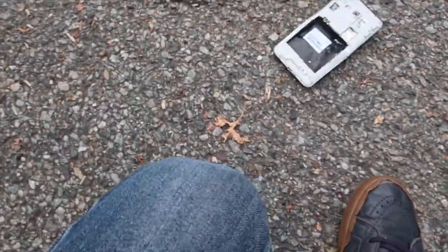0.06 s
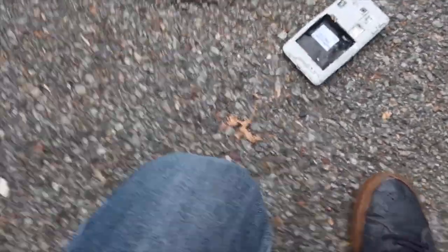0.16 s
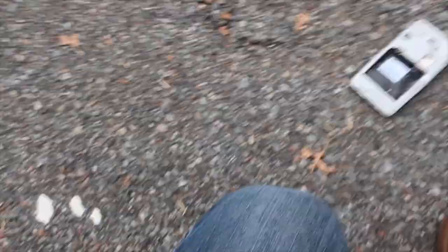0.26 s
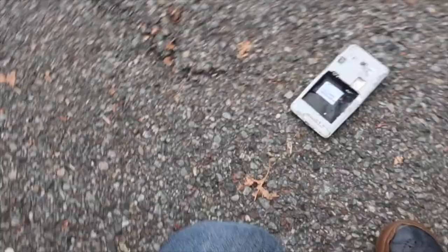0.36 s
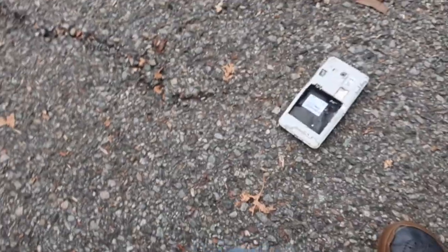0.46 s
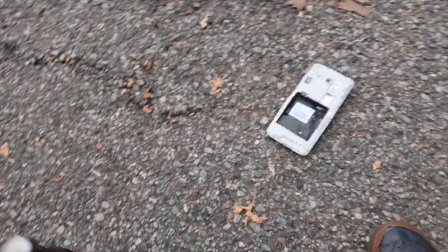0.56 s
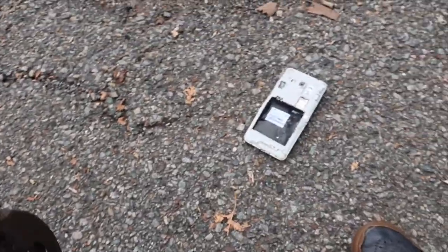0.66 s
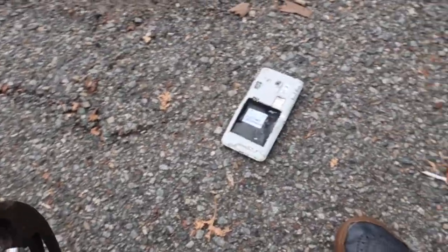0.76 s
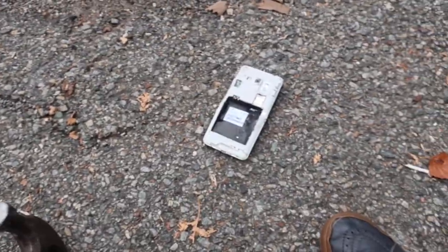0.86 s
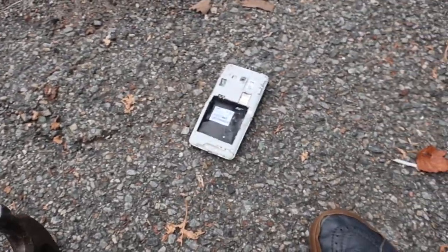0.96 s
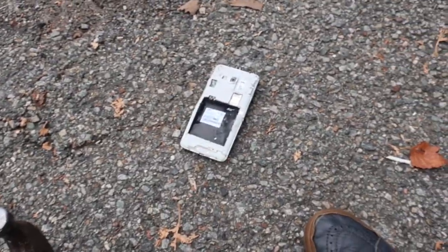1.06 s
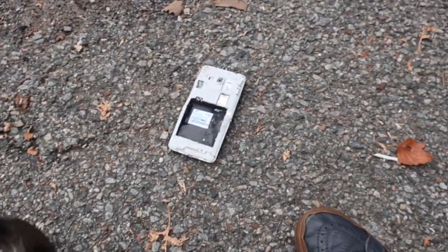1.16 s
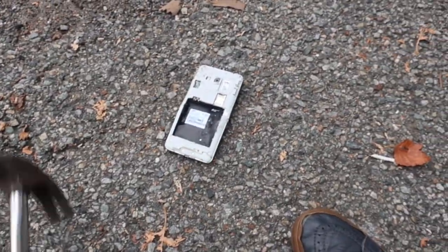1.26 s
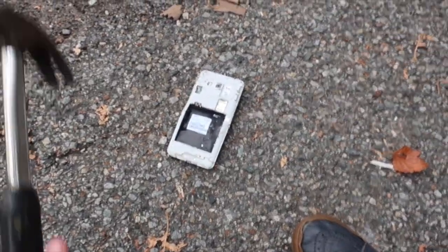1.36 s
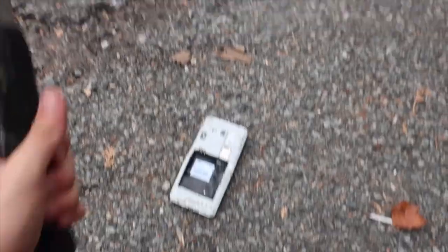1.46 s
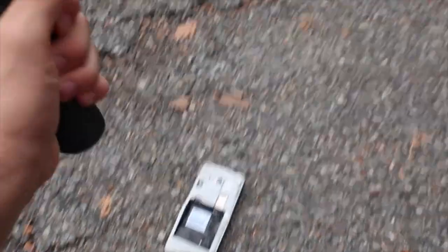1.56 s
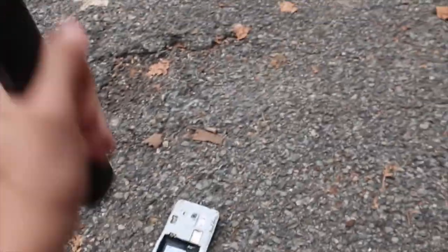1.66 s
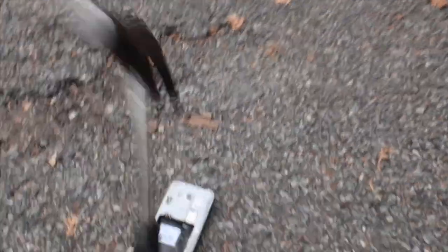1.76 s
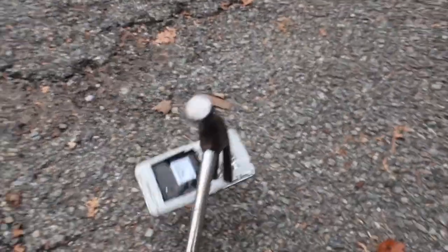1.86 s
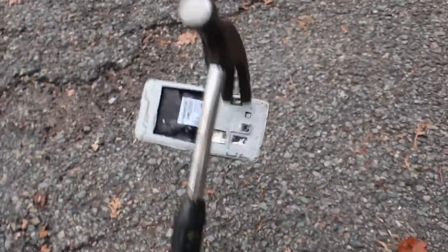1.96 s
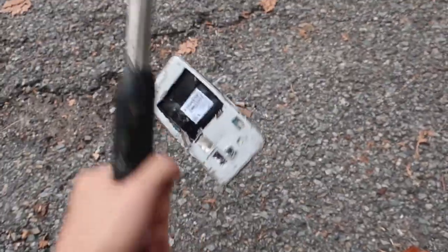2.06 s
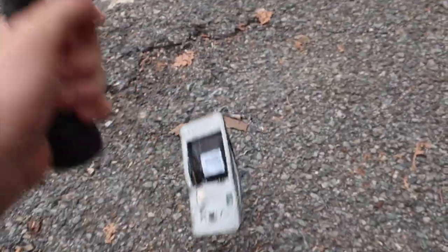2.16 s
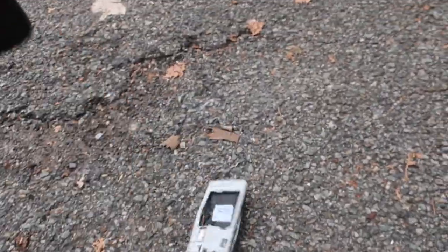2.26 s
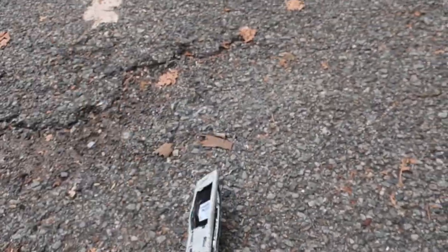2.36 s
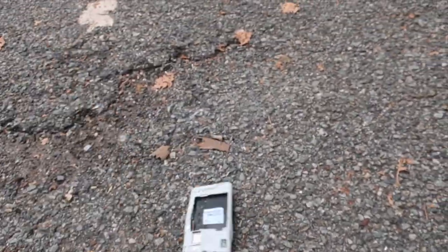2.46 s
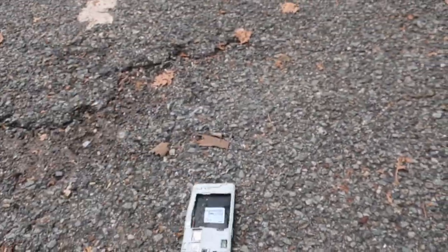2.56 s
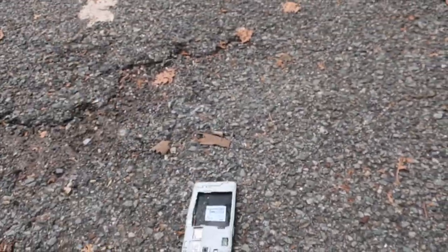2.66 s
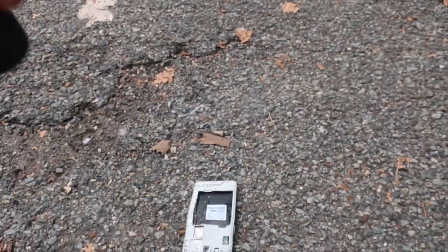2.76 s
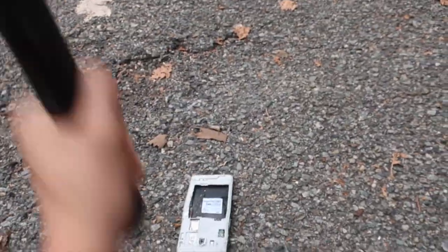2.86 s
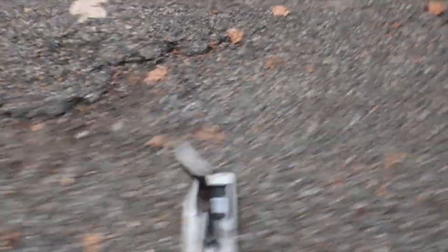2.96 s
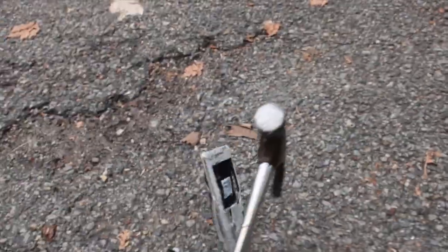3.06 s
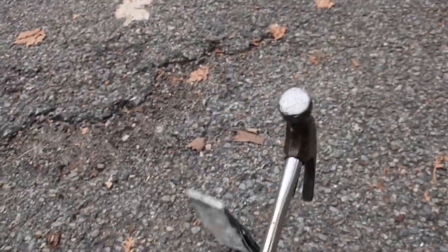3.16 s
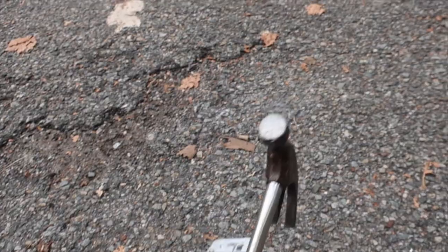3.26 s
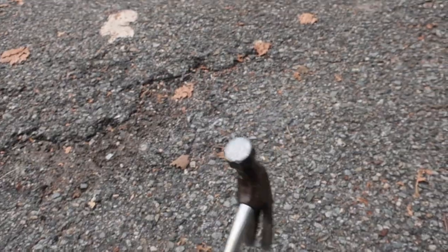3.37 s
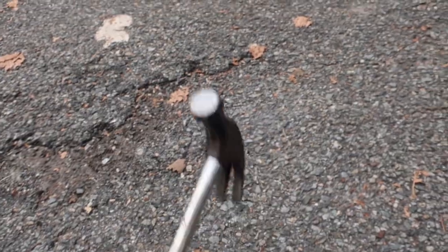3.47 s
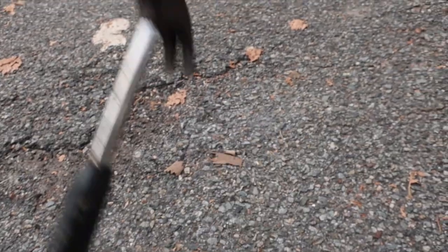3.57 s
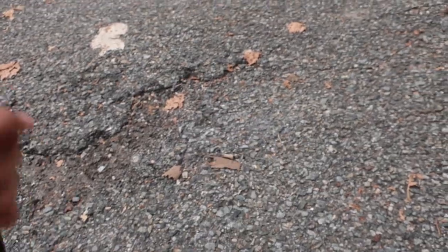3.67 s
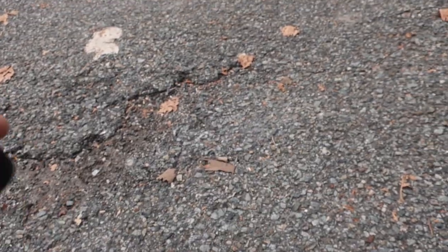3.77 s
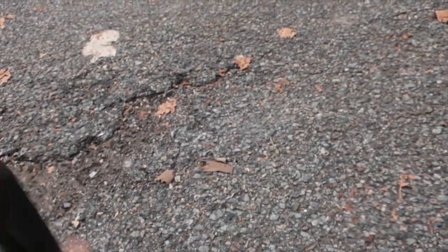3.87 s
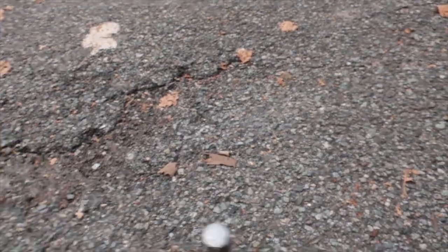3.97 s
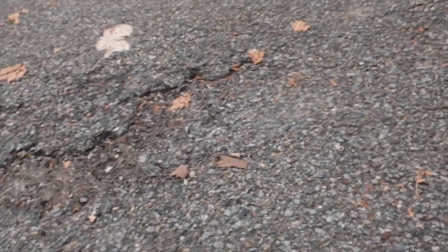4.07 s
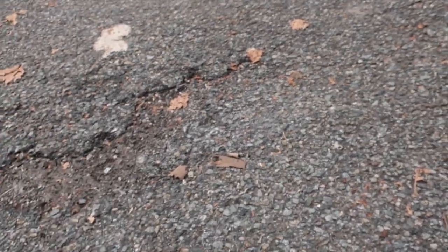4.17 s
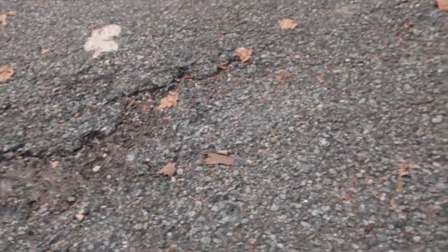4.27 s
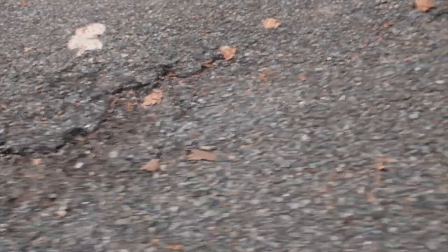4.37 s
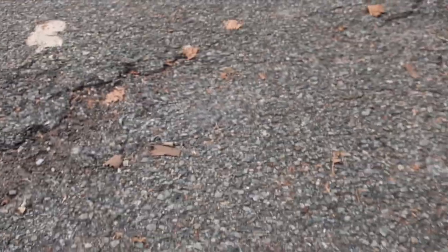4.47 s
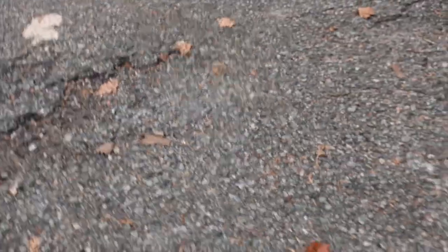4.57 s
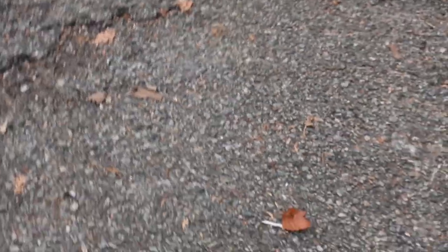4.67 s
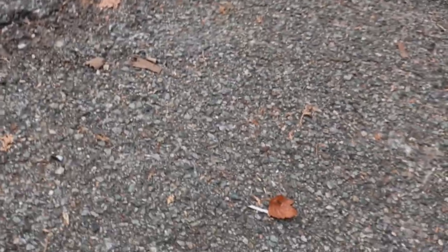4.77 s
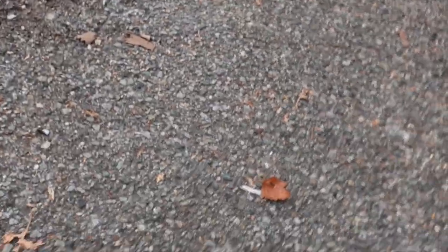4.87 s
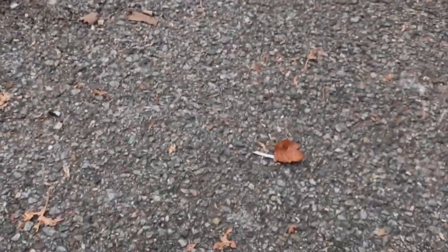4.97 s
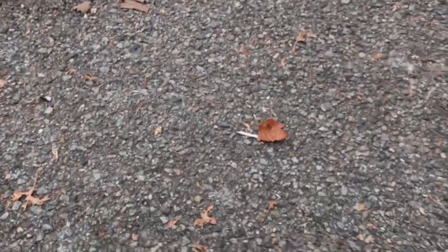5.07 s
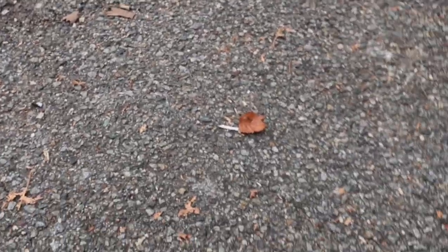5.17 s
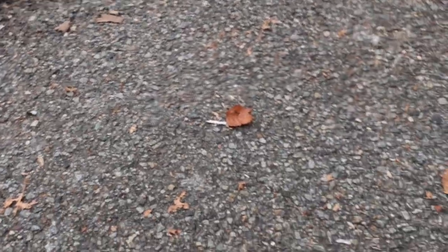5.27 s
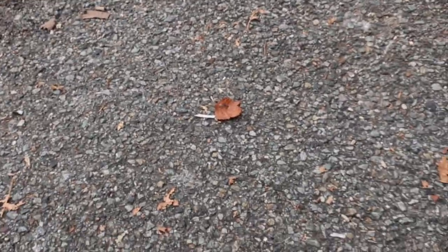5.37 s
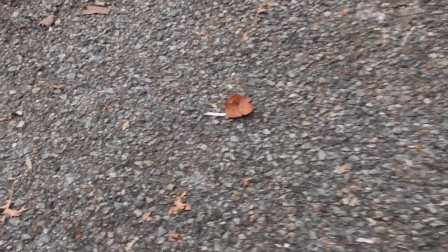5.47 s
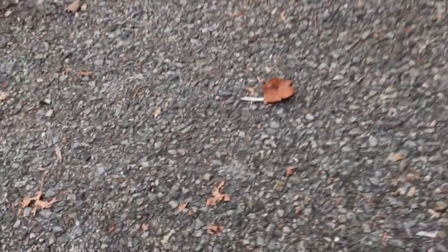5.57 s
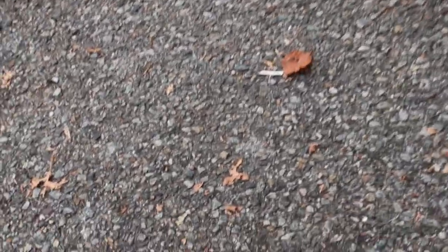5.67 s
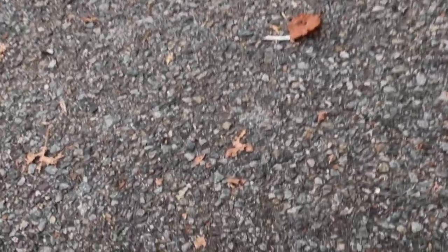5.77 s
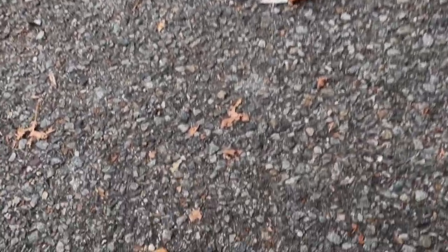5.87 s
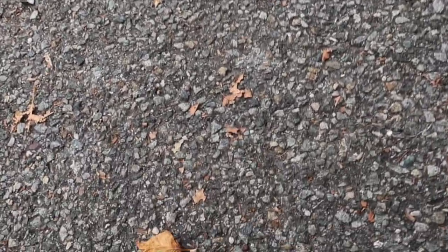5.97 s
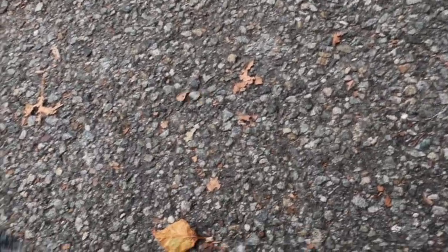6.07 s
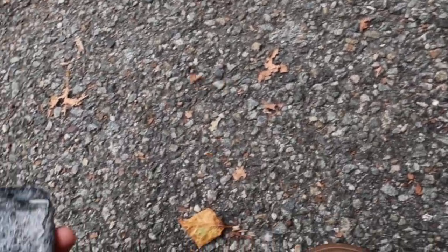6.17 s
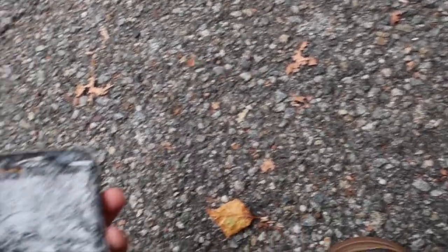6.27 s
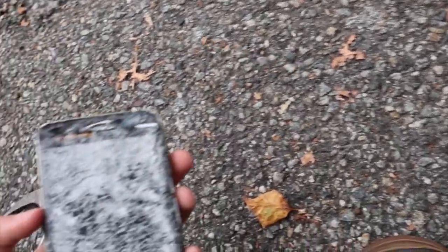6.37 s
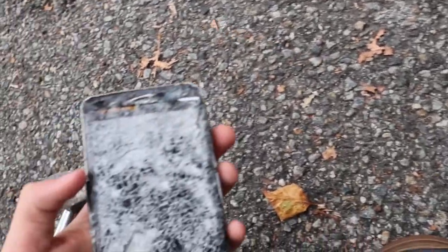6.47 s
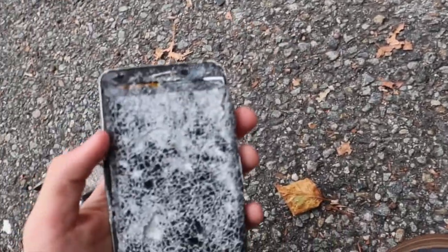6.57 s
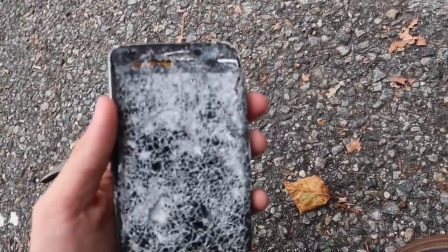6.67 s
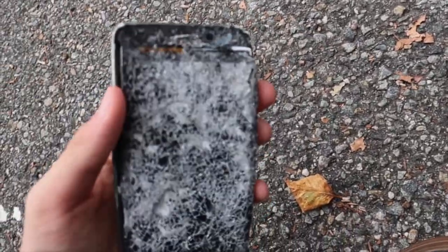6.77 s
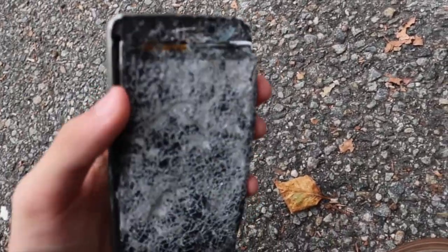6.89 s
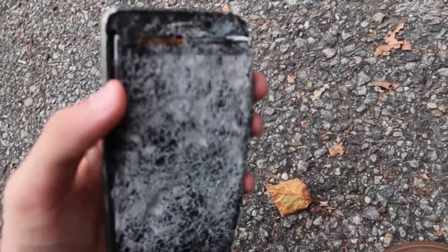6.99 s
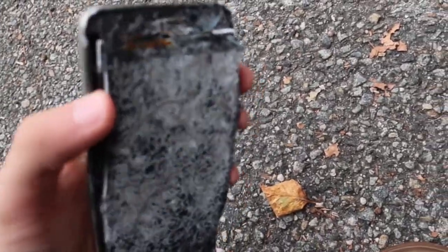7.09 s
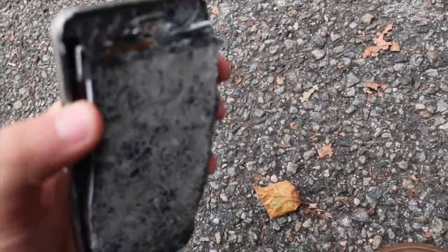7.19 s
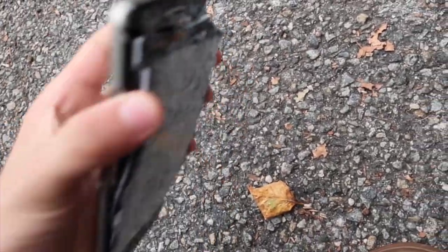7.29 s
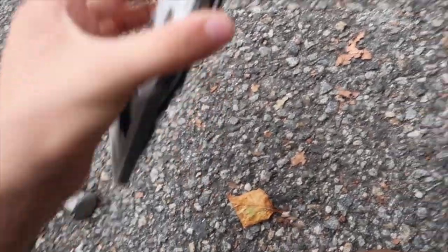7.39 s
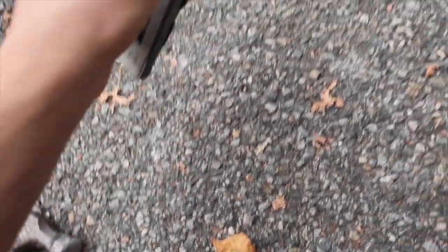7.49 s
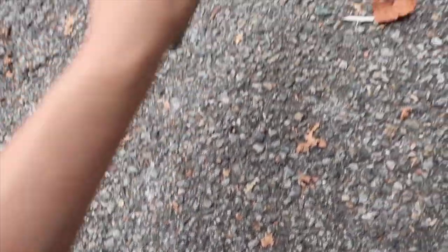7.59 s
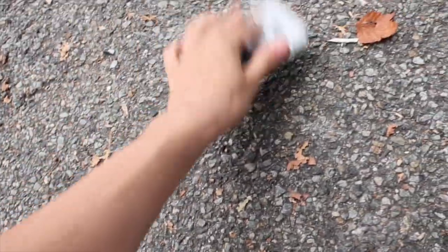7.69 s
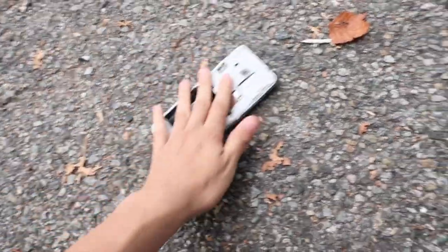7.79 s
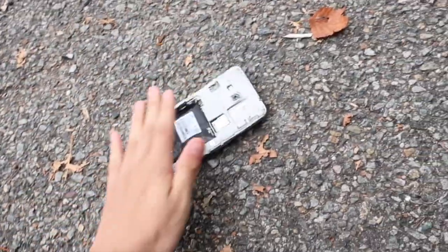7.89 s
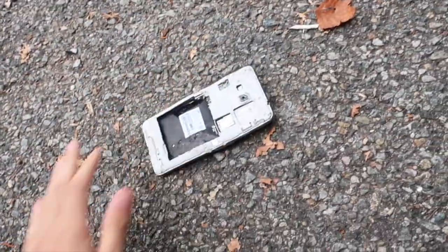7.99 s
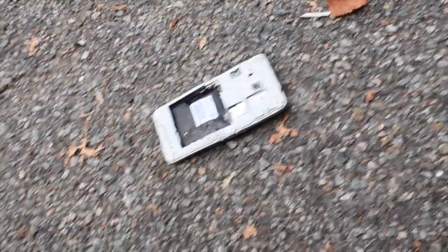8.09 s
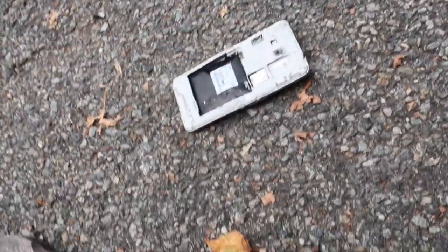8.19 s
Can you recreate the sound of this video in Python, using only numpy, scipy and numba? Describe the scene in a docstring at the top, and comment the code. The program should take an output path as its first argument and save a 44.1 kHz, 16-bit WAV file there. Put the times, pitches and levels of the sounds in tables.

```python
"""A hammer comes down three times on a broken phone lying on asphalt; later the phone is dropped flat.
Each blow is a gliding, noisy crack with a ringing case, a sinking thud and a spray of shards.
Around the blows, steel and plastic tap, click and ping, and pieces slide and scrape as grainy noise.
Distant traffic is shaped noise with a low hum. A gain control pulls loud peaks down, then creeps back;
what still exceeds its ceiling is clipped."""
import sys
import numpy as np
from scipy import signal
from scipy.fft import rfft, irfft
from scipy.io import wavfile
from scipy.ndimage import uniform_filter1d
from numba import njit

SR = 44100
rng = np.random.default_rng(int(sys.argv[2]) if len(sys.argv) > 2 else 0)


def store_pcm(level_fs):
    """Save levels as 16-bit WAV."""
    pcm = np.round(np.clip(level_fs, -1, 1) * 32767).astype(np.int16)
    wavfile.write(sys.argv[1], SR, np.atleast_2d(pcm).T)


N = 363384

# Modes of the broken case: (frequency [Hz], relative level [dB], t60 [s])
CASE_MODES = [(667, -2, 0.013), (907, -1.5, 0.024), (1830, -2.5, 0.027), (3030, -9, 0.027),
              (3830, -2, 0.016), (5200, -7, 0.016)]
# Hammer blows and the flat drop; every level after the first is relative to the blow:
# (time [s], level [dB], first crack pitch [Hz], last crack pitch [Hz], ground thud [dB], treble [dB],
#  case ring trim [dB], shards [dB], lean to the right [ratio], contact [s])
BLOWS = [(1.9102, 14.5, 2493, 4117, 2.5, -14, -4.5, -18, 0.18, 0.0047),
         (3.0761, 13, 2760, 4214, 4.5, -12.5, -13, -24, 0.22, 0.0055),
         (4.0733, 15.5, 4473, 965, 6, -28, -7, -17.5, 0.29, 0.0044),
         (7.813, 14.5, 3890, 3760, -15.5, -16, -13, -22, 0.18, 0.00353),
         (7.8282, 10.5, 2800, 1520, -11, -17, -5.5, -16, 0.24, 0.0029)]


def blows():
    """The case cracks while in contact and rings on; the asphalt answers with a low thud as contact ends."""
    let_go_s, thud_hz, thud_t60_s = .0004, 350, .015
    thud_sag_s = .0066  # the thud's pitch sinks as the ground gives
    crack_wobble, crack_noise_db = .5, -7
    out, t = np.zeros((2, N)), np.arange(4000) / SR
    for s, db, first_hz, last_hz, thud_db, treble_db, ring_db, shards_db, lean, touch in BLOWS:
        noise = rng.standard_normal((5, len(t)))
        late = np.maximum(t - touch, 0)  # time since contact ended
        contact = np.clip(t / .0017, 0, 1) * np.exp(-late / let_go_s)

        hz = first_hz * (last_hz / first_hz) ** np.minimum(t / (.65 * touch), 1)
        hz = hz * (1 + crack_wobble * band(noise[0], 110, 2800))
        crack = np.sin(2 * np.pi * np.cumsum(hz) / SR)
        crack = crack + level(band(noise[1], 1100, 5900), crack_noise_db)
        crack = contact * (crack + level(band(noise[2], 5100, 21000), treble_db))

        thud_phase = 2 * np.pi * thud_hz * thud_sag_s * (1 - np.exp(-late / thud_sag_s))
        thud = -undb(thud_db) * np.sin(thud_phase) * decay(late, thud_t60_s)

        case = np.zeros(len(t))
        for mode_hz, mode_db, t60 in CASE_MODES:
            rattle = band(rng.standard_normal(len(t)), mode_hz / 1.117, mode_hz * 1.1)
            case += undb(mode_db + ring_db) * level(rattle, -3.8) * decay(late, t60)

        settle = grit(len(t), 1.8) * decay(t, .07)
        shards = level(band(noise[3], 910, 11000), shards_db) * settle
        spray = level(band(noise[4], 1500, 21000), -20.5) * (contact + undb(shards_db + 19) * settle)
        side = spray - lean * band(crack + case + thud, 300, 1700)
        add(out, s, undb(db) * np.array([crack + case + thud + shards, side]))
    return out


# Small knocks, each starting half a millisecond early; levels are rms over its first 340 samples:
# (time [s], nominal t60 [s], thump [dB], knock [dB], knock pitch [Hz], treble [dB], treble pitch [Hz])
TAPS = [(0.2753, 0.0049, -24.5, -43, 1860, -62, 11700), (0.305, 0.0093, -23, -28, 950, -52, 10000),
        (0.3147, 0.012, -20, -43, 950, -52, 8000), (0.521, 0.021, -30, -36.5, 1930, -61, 7900),
        (0.9567, 0.011, -9.5, -29.5, 3700, -20.5, 8750), (1.038, 0.018, -23, -43, 6900, -49, 9350),
        (1.069, 0.028, -33, -39, 5000, -52, 5600), (1.073, 0.009, -30, -49, 1000, -45, 6800),
        (1.089, 0.0099, -33, -48, 990, -46, 6460), (1.109, 0.011, -33, -51, 1200, -62, 13000),
        (1.242, 0.022, -50, -56, 933, -50, 5960), (1.903, 0.053, -23, -24.5, 2890, -34, 6330),
        (1.9062, 0.012, -19.5, -25.5, 2840, -31, 6050), (1.925, 0.012, -23, -17, 4060, -34, 10900),
        (1.928, 0.012, -34, -24, 4070, -38, 10500), (1.935, 0.04, -35.5, -21, 3290, -41, 5400),
        (2.333, 0.038, -41, -17, 3220, -50, 6300), (2.337, .029, -40.5, -22, 3300, -33.5, 12200),
        (2.351, 0.04, -34, -20.5, 4450, -35, 8300), (2.358, 0.014, -35, -14.5, 3530, -48, 7300),
        (2.364, 0.02, -40, -13.5, 2070, -42, 5900), (2.512, 0.031, -54, -36, 4360, -47, 11700),
        (2.517, 0.034, -42, -35, 1190, -63, 5180), (2.585, 0.031, -40, -26.5, 1885, -53, 9100),
        (2.593, 0.02, -43.5, -26, 3980, -44.5, 12600), (2.671, 0.0093, -41, -38, 3090, -69, 6600),
        (3.245, .015, -51.5, -36, 2800, -56.5, 11100), (3.275, 0.028, -36, -30.5, 3000, -43.5, 7570),
        (3.427, 0.022, -47.5, -19, 1780, -48, 5330), (3.4311, 0.023, -37, -15.5, 4260, -46, 7300),
        (3.445, 0.027, -54, -29, 1900, -42, 11900), (3.542, 0.025, -30, -23.5, 2100, -35, 5440),
        (3.86, 0.022, -49, -35, 990, -57.5, 12500), (4.18, 0.03, -59, -28.5, 1700, -46.5, 5200),
        (4.223, .021, -45, -42, 4280, -55, 6500), (4.232, 0.033, -54, -24, 4700, -49, 5900),
        (4.268, 0.01, -36, -23.5, 1880, -50, 5650), (4.299, 0.023, -47, -29.5, 1900, -53, 6400),
        (4.34, 0.02, -43, -32, 2030, -54, 5100), (4.4, 0.015, -36, -33, 1690, -48.5, 5200),
        (4.955, 0.024, -17, -60.5, 1000, -54, 13100), (4.974, 0.038, -28, -30.5, 1860, -55, 12760),
        (4.983, 0.02, -27, -30, 1930, -52, 7950), (5.062, 0.0081, -15, -22.5, 3020, -26, 5770),
        (5.067, 0.022, -24, -24.5, 5140, -37, 8900), (5.116, 0.045, -28.5, -56, 1710, -57, 8000),
        (5.123, 0.005, -27.5, -44.5, 1230, -49, 7950), (5.212, 0.033, -63, -48, 960, -52, 11100),
        (5.2535, 0.0073, -24.5, -32, 2130, -57, 5200), (5.2673, 0.0043, -15, -10.5, 1310, -43, 5530),
        (5.333, 0.012, -48, -25, 1390, -47.5, 5560), (5.356, 0.0052, -19.5, -23, 1400, -34.5, 5470),
        (5.497, 0.006, -26, -31, 940, -57, 12700), (5.5478, 0.021, -16, -40, 1040, -62, 5150),
        (5.558, 0.029, -19, -44.5, 1020, -56, 5950), (5.564, 0.02, -28, -22, 1040, -60, 3570),
        (5.581, 0.023, -25.5, -28, 1000, -58, 11700), (5.959, 0.025, -31, -40, 1020, -58, 5450),
        (6.39, 0.02, -36, -41, 1036, -57.5, 7500), (6.749, 0.027, -45, -39.5, 2600, -60.5, 7270),
        (7.249, 0.026, -46, -46.5, 1000, -61.5, 12300), (7.521, 0.015, -31, -49, 1000, -63, 12550),
        (7.8253, 0.023, -23, -10.5, 3900, -30, 5950)]


def taps():
    """Small knocks and scrapes: a thump, a ragged knock and a treble ring or spit."""
    octaves_per_s, treble_side_db, thump_side = 34, 19, .06
    out, t = np.zeros((2, N)), np.arange(3500) / SR
    for s, t60, thump_db, knock_db, hz, treble_db, treble_hz in TAPS:
        t60 = max(t60, .004)
        half = 2 ** (np.clip(octaves_per_s * t60, .2, 2) / 2)  # short taps ring in a narrower treble band
        push = (1 - np.exp(-t / (.14 * t60))) ** 2 * decay(t, t60)  # slower contact for longer sounds
        noise = rng.standard_normal((6, len(t))) * push * grit(len(t), 1.6)

        push_low = noise[0] * 1000. ** (.35 * t / t60)  # the bass dies away more slowly
        thump = band(push_low, 110, 460) + min(.0044 / t60, .6) * band(push_low, 380, 1100)
        thump = level(thump, thump_db, span=340)

        tick = band(noise[2] * decay(1.5 * t, t60), hz / 3, hz * 1.56)  # first contact: broad and short
        knock = band(noise[1], hz / 1.15, hz * 1.118) + 1.6 * tick
        knock = level(knock, knock_db, span=340)

        treble, across = band(band(noise[3:5], treble_hz / half, treble_hz * half), 3400, 14500)
        treble = level(treble, treble_db, span=340)
        across = level(across, treble_db + treble_side_db, span=340)
        across = across + level(band(noise[5], 2000, 6000), knock_db - 17.5, span=340)
        add(out, s - .0005, np.array([thump + knock + treble, across - thump_side * thump]))
    return out


# Modes of the hammer head: (frequency [Hz], relative level [dB], t60 [s])
STEEL_MODES = [(4450, 5, 0.012), (5650, 11.5, 0.015), (8940, -5, 0.045)]
# Hammer head touches: (time [s], level [dB], lift of the top mode [dB])
STEEL_TAPS = [(5.066, -28, 12), (5.2688, -30, 1), (5.333, -36.5, -24), (5.357, -22, -7)]


def steel():
    """The hammer head touches the ground and its modes ring briefly as decaying sines."""
    out, t = np.zeros((2, N)), np.arange(3000) / SR
    for s, db, top_db in STEEL_TAPS:
        ring = np.zeros(len(t))
        for (hz, mode_db, t60), lift_db in zip(STEEL_MODES, [0, 0, top_db]):
            ring += undb(mode_db + lift_db) * np.sin(2 * np.pi * hz * t) * decay(t, t60)
        onset = np.clip(t / .00046, 0, 1)
        add(out, s, undb(db) * ring * onset * grit(len(t), 2.0) * [[1], [1.1]])
    return out


# Hard point contacts, one broad snap each: (time [s], peak level [dB], lowest [Hz], highest [Hz])
CLICKS = [(.2742, -11, 600, 3600), (.306, -24, 2500, 4000), (.3142, -10, 500, 1600), (.9568, -6, 400, 4500),
          (1.0392, -14, 500, 5000), (1.0688, -24, 4000, 10000), (1.0755, -17, 500, 3500),
          (2.335, -9, 1800, 12000), (2.3395, -14, 2000, 12000), (2.3517, -9, 800, 14000),
          (2.3562, -9, 3000, 12000), (2.359, -4, 400, 4500), (2.3617, -2, 450, 5000),
          (2.3645, -8, 350, 3000), (2.3675, -7, 400, 2800), (2.3705, -14, 3000, 7000),
          (2.513, -33, 4000, 14000), (2.518, -32, 3500, 14000), (2.587, -30, 3000, 14000),
          (2.594, -20, 900, 7000), (3.4272, -13, 1100, 4500), (3.4322, -5, 500, 6500),
          (3.4345, -10, 450, 4000), (3.444, -20, 2500, 7000), (3.438, -24, 700, 3000),
          (3.544, -26, 800, 4000), (4.2695, -18, 900, 3000), (4.2335, -19, 2500, 7000),
          (4.2375, -18, 2500, 7000), (4.241, -19, 1800, 4000), (4.246, -20, 1500, 4000),
          (4.2735, -19, 3300, 5000), (4.385, -24, 1200, 5500), (4.4125, -20, 1500, 3000),
          (5.0624, -7, 400, 6500), (5.083, -25, 3800, 7000), (5.1236, -6, 600, 2800),
          (5.2533, -10, 600, 3500), (5.2683, 3.5, 800, 4200), (5.3322, -9, 1300, 3200),
          (5.3572, -6, 500, 4000), (5.4845, -33, 2800, 5000), (5.4961, -10, 600, 2100),
          (5.5695, -22, 2200, 4500), (5.789, -40, 4000, 10000), (5.8095, -34, 3800, 10000),
          (5.8715, -32, 2500, 5500), (5.883, -36, 3000, 7000), (5.918, -24, 3200, 8000),
          (5.958, -32, 3000, 5500), (7.8275, -1, 2500, 5500), (7.867, -14, 1200, 3500),
          (7.871, -14, 900, 3000), (7.891, -17, 1200, 3500), (8.017, -22, 3000, 4500),
          (8.037, -23, 500, 3200), (8.068, -30, 3000, 7000), (8.146, -30, 3000, 7500)]


def clicks():
    """A sudden push and two quick weaker chatters, through a wide band."""
    out = np.zeros((2, N))
    for s, db, lo_hz, hi_hz in CLICKS:
        push, chance = np.zeros(600), rng.random(2)
        push[0] = 1
        push[int(12 + 14 * chance[0])] = -.5
        push[int(34 + 24 * chance[1])] = .3
        snap = band(band(push, lo_hz, hi_hz), lo_hz / 4, hi_hz * 1.6)
        add(out, s, undb(db) * snap / np.abs(snap).max() * [[1], [.15]])
    return out


# Short narrow pings of hammer steel and small pieces: (time [s], pitch [Hz], level [dB], length [s])
PINGS = [(.956, 9600, -10, .0035), (.9565, 7500, -14, 0.004), (1.0385, 7100, -18, 0.0037),
         (1.0385, 9800, -24, .004), (1.069, 5000, -28, .005), (1.0745, 6900, -29, 0.0034),
         (1.93, 4040, -5, 0.0046), (4.15, 3900, -30, .004), (4.154, 3870, -25, .007),
         (4.174, 4100, -26, .005), (4.221, 3280, -23, 0.0044), (4.222, 4200, -33, .004),
         (4.27, 5600, -22, .005), (4.31, 4700, -31, .006), (4.34, 2150, -15, 0.008),
         (4.4005, 1800, -14, 0.006), (2.38, 3400, -20, .006), (7.95, 4300, -28, .005),
         (7.968, 4600, -31, .005), (8.014, 3600, -33, .006)]


def pings():
    """Each ping swells and fades on one slightly wavering note."""
    out, t = np.zeros((2, N)), np.arange(800) / SR
    for s, hz, db, length in PINGS:
        waver = 1 + .034 * level(band(rng.standard_normal(len(t)), 100, 600), 0)
        swell = np.sin(np.pi * np.clip(t / length, 0, 1) ** .92)
        note = np.sin(2 * np.pi * np.cumsum(hz * waver) / SR) * swell
        add(out, s, undb(db) * note * [[1], [.3]])
    return out


# Pieces sliding over the grit:
# (start [s], end [s], level [dB], ring pitch [Hz], low body relative to the ring [dB])
SLIDES = [(1.953, 2.016, -46, 3500, 11), (2.344, 2.367, -28, 2500, 5.5), (2.364, 2.41, -46, 3980, 1),
          (3.089, 3.193, -41.5, 3900, -11), (3.423, 3.447, -28, 3570, 2.5), (4.127, 4.194, -35.5, 3780, 2),
          (4.229, 4.256, -34.5, 5300, 3), (4.291, 4.376, -37.5, 4650, 3.5),
          (4.367, 4.468, -42.5, 4520, 7.5), (7.845, 7.94, -37, 2740, 4), (7.936, 7.991, -34, 4340, -10),
          (7.988, 8.024, -42.5, 3770, -11), (8.03, 8.1, -42, 2670, -8)]


def slides():
    """Each slide is a run of grains that rings the piece, starting and stopping within milliseconds."""
    out, t = np.zeros((2, N)), np.arange(4800) / SR
    for start, end, db, hz, body_db in SLIDES:
        span = int((end - start) * SR)
        edges = np.clip(np.minimum(t, end - start - t) / .0095, 0, 1)
        noise = rng.standard_normal((3, len(t))) * grit(len(t), 3.5) * edges
        ring = level(band(noise[:2], hz / 1.346, hz * 1.15), 0, span) * [[1], [.5]]
        body = level(band(noise[2], 910, 2400), body_db, span) * [[1], [.2]]
        add(out, start, undb(db) * (ring + body))
    return out


# Spells of dragging; levels are relative gains:
# (start of hold [s], hold [s], scrape [dB], treble [dB], pitch where the pieces resonate [Hz])
RUSTLES = [(.26, 0.051, -35, -40, 3440), (.98, 0.052, -57, -34, 3410), (1.33, 0.13, -62, -45, 3570),
           (1.63, 0.029, -38.5, -47, 3455), (1.87, .02, -50, -58, 3640), (1.94, 0.071, -19.5, -27.5, 3610),
           (2.34, 0.068, -33.5, -32, 4170), (2.46, 0.4, -39, -54.5, 3935), (2.86, 0.13, -30.5, -66, 4910),
           (3.12, 0.083, -26, -29, 3985), (3.26, 0.3, -35, -38.5, 4134), (3.87, 0.16, -50, -53, 3903),
           (4.11, 0.074, -19, -22, 3974), (4.28, 0.11, -22, -29, 4614), (4.44, 0.13, -36, -41, 4730),
           (5.06, 0.054, -30, -34, 4285), (5.945, 0.02, -36, -55, 4500), (6.33, 0.42, -45, -56, 3310),
           (7.3, 0.21, -57, -50, 2772), (7.84, 0.011, -15, -16, 2396), (7.87, 0.071, -19, -26, 3200),
           (7.945, 0.03, -27, -30, 4210), (8.01, 0.15, -37, -51, 3010)]


def rustle():
    """Grit, shards and cloth drag: a grainy scrape with its own treble swells, holds and sinks."""
    # each pair: scrape, treble
    rise_db_s, fall_db_s = np.array([300, 350]), np.array([150, 220])
    rest_db = np.array([-55, -74])  # between the spells
    t, gain = np.arange(N) / SR, undb(rest_db)[:, None]
    for s, hold, scrape_db, treble_db, _ in RUSTLES:
        before, after = np.maximum(s - t, 0), np.maximum(t - s - hold, 0)
        fade_db = np.outer(rise_db_s, before) + np.outer(fall_db_s, after)
        gain = np.maximum(gain, undb(np.array([[scrape_db], [treble_db]]) - fade_db))
    noise = rng.standard_normal((2, 2, N)) * grit(N, 2.8) * undb(2.5 * walk(37))
    hz = curve(*np.transpose(RUSTLES)[[0, -1]])
    scrape = np.array([svf(x, hz, .14) for x in noise[0]]) + band(noise[0], 1300, 5500)
    scrape = level(scrape, -14.0) * gain[0] * undb([[0], [-3]])
    treble = level(band(noise[1], 4300, 16000), -20.5) * gain[1] * undb([[0], [1]])
    return scrape + treble


# Spectrum of the smooth traffic wash: (frequency [Hz], relative density [dB per Hz])
WASH = [(120, -26), (200, 1.5), (291, -3.5), (422, -5), (495, -9.5), (772, -6), (1600, -10.5),
        (2540, -19.5), (6290, -43.5), (12800, -68), (14000, -67)]
# Spectrum of the traffic rumble: (frequency [Hz], relative density [dB per Hz])
RUMBLE = [(13, -24.5), (22, -21.5), (48, 1.5), (103, 2), (124, -0.5), (151, -4.5), (187, -6), (300, -16.5),
          (390, -38), (660, -120)]
# Rise and fall of the rumble: (time [s], relative level [dB])
RUMBLE_SWELL = [(0, -23), (.5, -20), (1.0, -23), (1.3, -26), (1.8, -24.5), (2.3, -23.5), (2.9, -22),
                (3.6, -24.5), (4.2, -24), (5.1, -22), (5.5, -28), (6.0, -24.5), (6.5, -23), (7.5, -24),
                (8.24, -23)]
# Traffic hum: (time [s], pitch [Hz], level [dB])
HUM = [(3.2, 76.4, -79), (3.35, 73.4, -21), (3.8, 77.1, -26), (4.0, 76, -58)]


def traffic():
    """Far traffic: a wavering rumble, a smooth wash above it, and a low hum that swells once."""
    s, hz, db = np.transpose(HUM)
    hum = undb(curve(s, db)) * np.sin(2 * np.pi * np.cumsum(curve(s, hz)) / SR)
    rumble_db = curve(*np.transpose(RUMBLE_SWELL)) + .44 * walk(1.7)
    rumble = coloured(RUMBLE, -2.1) * undb(rumble_db)
    wash = coloured(WASH, -31) * undb(.97 * walk(3.34))
    return rumble + wash + np.array([hum, 0 * hum])


# Stereo width of the traffic: (frequency [Hz], side minus mid [dB])
WIDTH = [(60, -42.5), (110, -42), (200, -35), (380, -16.5), (700, -15), (1290, -11), (2380, -6),
         (4400, -0.5), (8120, 9), (15000, 13.5)]


def coloured(table, db):
    """Steady noise of a given spectrum as mid and side; db sets the rms of the mid."""
    hz = np.maximum(np.fft.rfftfreq(N, 1 / SR), 1)
    gains = undb(on_log(table, hz) + np.array([0 * hz, on_log(WIDTH, hz)]))
    noise = irfft(rfft(rng.standard_normal((2, N))) * gains, N)
    return noise * undb(db) / np.sqrt(np.mean(noise[0] ** 2))


def grit(count, scatter_db):
    """Gains of grains about a millisecond long, a few much bigger than the rest."""
    sizes = undb(scatter_db * (rng.exponential(size=count // 50 + 1) - 1.0))
    return uniform_filter1d(sizes.repeat(50)[:count], size=30)


def walk(rate):
    """Random levels held 1 / rate s and slewed twice; rms 1."""
    k = int(SR / rate)
    steps = np.repeat(rng.standard_normal(N // k + 1), k)
    return level(uniform_filter1d(uniform_filter1d(steps, k), k)[:N], 0)


@njit
def svf(x, hz, damp):
    """Resonant band-pass whose centre moves."""
    y, b, l = np.empty(len(x)), 0., 0.  # b and l: band and low states
    for i in range(len(x)):
        g = np.tan(np.pi * hz[i] / SR)
        v = (b + g * (x[i] - l)) / (1 + g * (g + damp))
        b, l, y[i] = 2 * v - b, l + 2 * g * v, damp * v
    return y


def decay(t, t60):
    """Exponential fade that falls 60 dB in t60 seconds."""
    return 1000. ** (-t / t60)


def undb(db):
    """Decibels to amplitude."""
    return 10 ** (np.asarray(db) / 20)


def curve(s, values):
    """Straight lines between breakpoints, over the whole scene."""
    return np.interp(np.arange(N) / SR, s, values)


def on_log(table, hz):
    """Reads a spectrum table along a logarithmic frequency axis."""
    table_hz, values = np.transpose(table)
    return np.interp(np.log(hz), np.log(table_hz), values)


def band(x, lo_hz, hi_hz):
    """Third-order Butterworth band-pass design."""
    return signal.sosfilt(signal.butter(3, [lo_hz, min(hi_hz, .45 * SR)], "band", fs=SR, output="sos"), x)


def level(x, db, span=None):
    """Sets the rms of the first span samples, or of the whole sound."""
    return x * undb(db) / np.sqrt(np.mean(x[..., :span] ** 2))


def add(out, s, sound):
    """Mixes a mid-side sound in at time s."""
    i = int(s * SR)
    out[:, i:i + sound.shape[1]] += sound[:, :N - i]


def scene():
    """Sums the mid-side layers and decodes them to left and right."""
    mid, side = blows() + taps() + steel() + clicks() + pings() + slides() + rustle() + traffic()
    return np.array([mid + side, mid - side])


@njit
def ride(x, top, attack, fall):
    """Gain from a peak follower that jumps up fast and sinks a steady number of dB a second."""
    gain, e = np.empty(len(x)), top
    for i in range(len(x)):
        if x[i] > e:
            e = e + (x[i] - e) * attack
        else:
            e = max(e * fall, top)
        gain[i] = top / e
    return gain


def record(dry):
    """Gain control on both channels together, overload, and the top cut off."""
    gain_top, attack_s, rise_db_s = .64, .005, 7.5
    top_hz, ceiling = 15800, .92
    peaks = np.abs(dry).max(axis=0)
    gain = ride(peaks, gain_top, 1 / (attack_s * SR), float(undb(-rise_db_s / SR)))
    clipped = np.clip(dry * gain, -ceiling, ceiling)
    return signal.sosfilt(signal.ellip(10, .2, 80, top_hz, fs=SR, output="sos"), clipped)


dry = scene()
out = record(dry)
store_pcm(out)
```